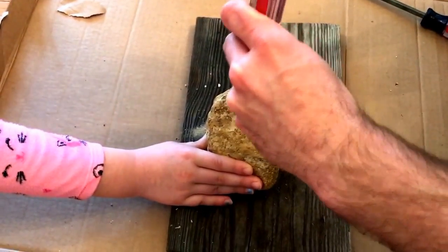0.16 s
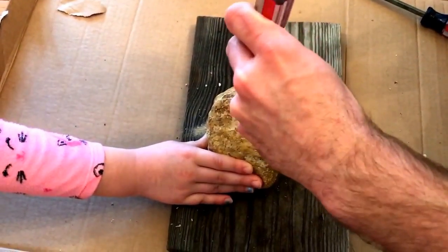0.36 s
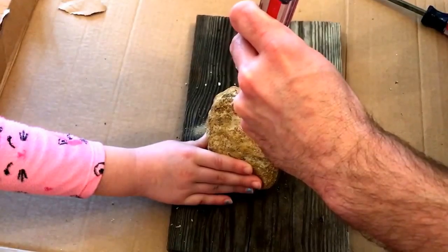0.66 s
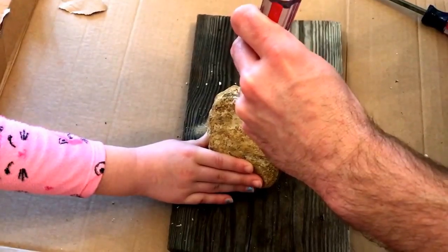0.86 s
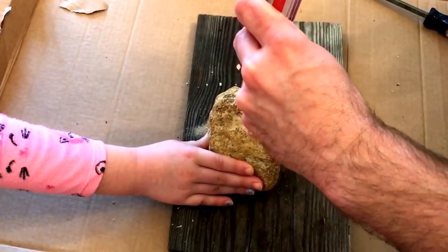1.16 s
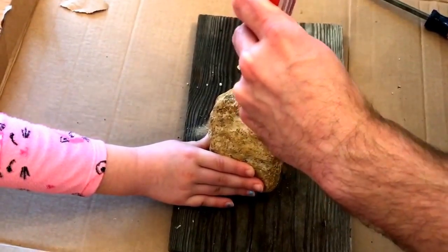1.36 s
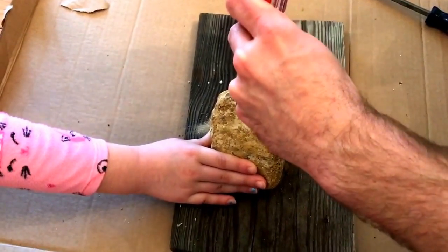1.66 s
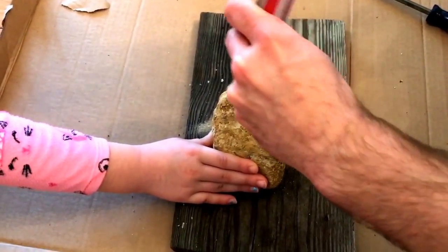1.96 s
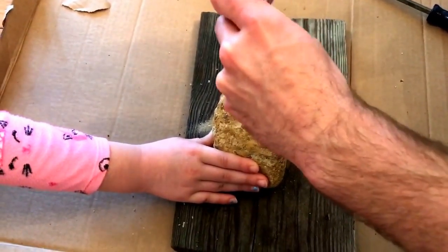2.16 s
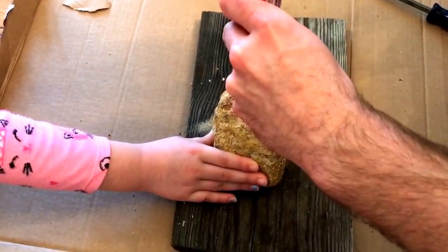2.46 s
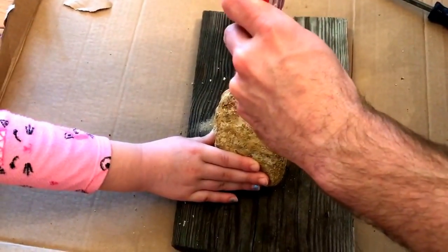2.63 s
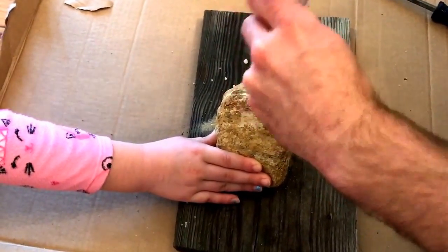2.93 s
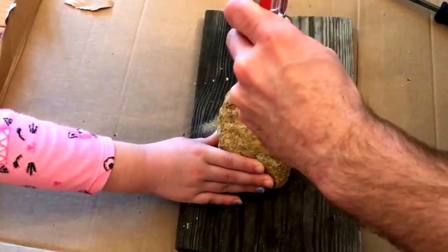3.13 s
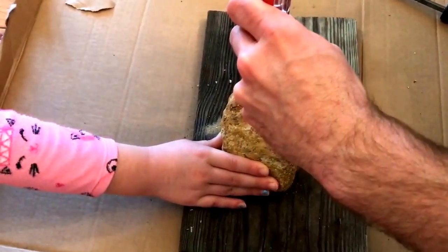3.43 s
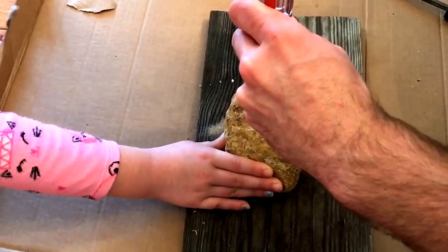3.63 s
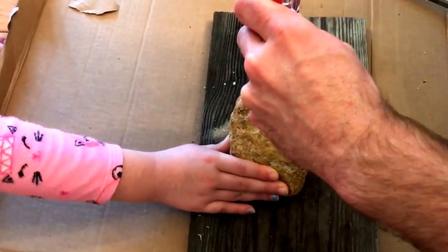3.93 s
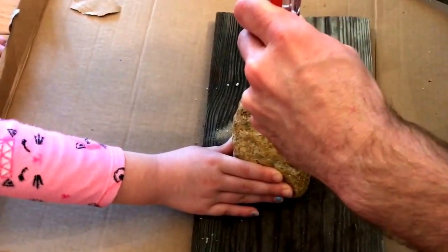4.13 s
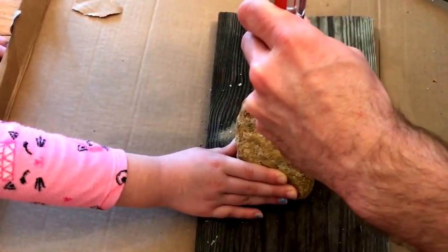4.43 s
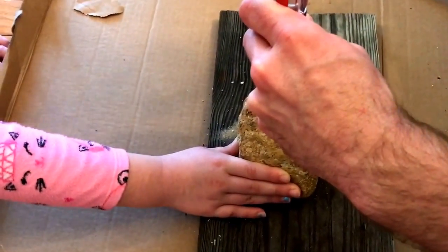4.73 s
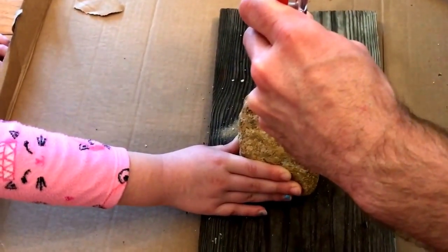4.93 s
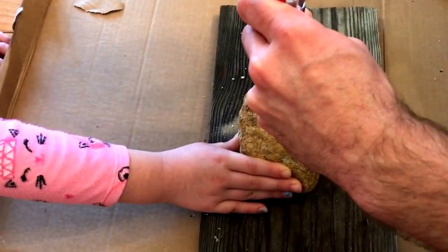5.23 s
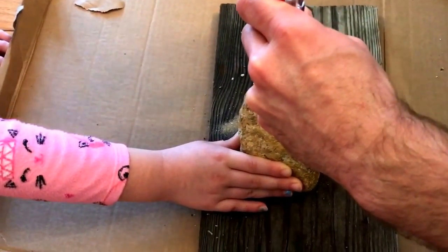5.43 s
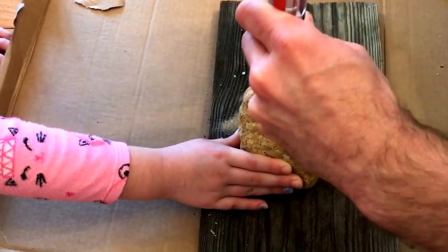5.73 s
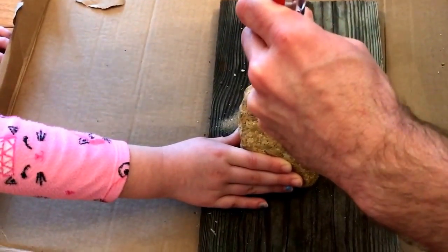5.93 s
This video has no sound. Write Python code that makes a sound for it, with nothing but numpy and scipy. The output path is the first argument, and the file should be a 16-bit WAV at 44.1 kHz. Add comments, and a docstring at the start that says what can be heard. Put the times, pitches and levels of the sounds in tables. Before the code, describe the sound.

The echo of an earlier hammer blow dies away with tiny clicks of a steel tip slipping on stone. Two hard blows strike the screwdriver used as a chisel, then two slips and a very short scrape. A lighter tap begins a regular run of blows, each a dry stony crack with a low plank thump, faint high ring and gritty chips. Close microphone in a small, lively room with a quiet low rumble.

```python
"""The tail of an earlier hammer blow, then small slips of a screwdriver tip on a lump of stone, over a quiet rumble.
Two blows follow on the screwdriver, held like a chisel, then two slips; the tip is dragged to a new place.
A run of blows ends the scene: each clicks, knocks the stone, thumps and rocks the plank under it in its
cardboard tray, rings the steel shaft, crushes grit and sends off chips. Parts are dying modes and noise bursts.
A small room answers; the gain control of the close microphone ducks the peaks over its limit."""
import sys
import numpy as np
from scipy import signal
from scipy.fft import rfft, irfft
from scipy.io import wavfile
from scipy.ndimage import uniform_filter1d, minimum_filter1d

SR = 44100
rng = np.random.default_rng(int(sys.argv[2]) if len(sys.argv) > 2 else 0)


def wav_out(sig):
    """Save sig, one row per channel (or a flat mono array), as 16-bit PCM at SR to the path in sys.argv[1]."""
    wavfile.write(sys.argv[1], SR, np.round(np.clip(np.atleast_2d(sig).T, -1, 1) * 32767).astype(np.int16))


N = 268569
LEAD_S = 1  # run-in, so that the earlier blow still echoes at the start


def amp(db):
    """Amplitude factor of a level in dB."""
    return 10 ** (np.asarray(db) / 20)


def read(points, hz):
    """Interpolates a (pitch_hz, value) table over log frequency."""
    pitch_hz, value = np.transpose(points)
    return np.interp(np.log(hz + 1), np.log(pitch_hz), value)


def add(mix, start_s, sound):
    """Mixes a sound in at start_s; what falls outside is dropped."""
    start = int(round(start_s * SR))
    sound = sound[max(-start, 0):]
    part = mix[max(start, 0):][:len(sound)]
    part += sound[:len(part)]


def noise(spectrum, size):
    """Coloured noise of rms 1."""
    gain = amp(read(spectrum, np.fft.rfftfreq(size, 1 / SR)))
    x = irfft(rfft(rng.standard_normal(size)) * gain, size)
    return x / x.std()


def burst(spectrum, decay_s):
    """One second holding a sharp puff of noise with exponential decay."""
    return noise(spectrum, SR) * np.exp(-np.arange(SR) / SR / decay_s)


def ring(modes, detune=0, step_gain=1):
    """One second of dying modes; a shifted grip detunes them, a negative step_gain opposes neighbours."""
    t = np.arange(SR) / SR
    pitch = 1 + detune * rng.standard_normal()
    out = np.zeros(SR)
    for k, (pitch_hz, level_db, t60_s) in enumerate(modes):
        envelope = amp(level_db - 60 * t / t60_s)
        out += step_gain ** k * envelope * np.sin(2 * np.pi * pitch_hz * pitch * t)
    return out


def snap(spectrum, lag_s):
    """Contact click spread by bending waves: treble arrives first, 1 kHz about lag_s later."""
    hz = np.fft.rfftfreq(SR, 1 / SR)
    phase = 4 * np.pi * lag_s * np.sqrt(1000 * hz)  # delay goes as 1 / sqrt(hz)
    return irfft(amp(read(spectrum, hz)) * np.exp(-1j * phase), SR) * np.linspace(1, 0, SR)


# background spectrum: pitch_hz, level_db
RUMBLE = [(20, -2.5), (60, 5), (125, -5), (200, -12), (500, -18.5), (1400, -20), (2500, -25.5),
          (6000, -28.5), (15000, -33.5)]


def rumble():
    """Steady, quiet background as coloured noise."""
    return amp(-63.5) * noise(RUMBLE, N)


def tail(colour, t60, onset_s):
    """Dense random reflections, each band dying at its own speed."""
    taps = rng.choice([-1., 1.], SR) * (rng.random(SR) < .2)
    hz, t, z = signal.stft(taps / taps.std(), SR, nperseg=256)
    rate = np.log(1000) / read(t60, hz)[:, None]
    level = amp(read(colour, hz))[:, None] * np.sqrt(2 * rate / SR)  # root: equal energy at any t60
    z = z * level * np.exp(-rate * t)
    fade_in = 1 - np.exp(-(np.arange(SR) / SR / onset_s) ** 2)
    return signal.istft(z, SR, nperseg=256)[1][:SR] * fade_in


# reflection spectra, near walls and long tail: pitch_hz, level_db
NEAR_COLOUR = [(50, -28), (140, -15), (220, -18), (300, -2.5), (600, -1.5), (1500, -7.5), (2500, -9),
               (4000, -9.5), (8000, -11.5), (15000, -42)]
LATE_COLOUR = [(50, -35), (140, -28.5), (280, -4), (700, -13), (1500, -10.5), (2500, -17.5), (4000, -17),
               (8000, -22), (15000, -15)]
# decay of each: pitch_hz, t60_s
NEAR_T60 = [(100, 0.74), (1000, 0.27), (3500, 0.28), (8000, 0.25), (15000, 0.24)]
LATE_T60 = [(100, 0.88), (1000, 1), (3500, 0.93), (8000, 0.73), (15000, 0.39)]


def room():
    """Direct sound, quick answer of near walls and a longer tail that builds more slowly."""
    response = tail(NEAR_COLOUR, NEAR_T60, onset_s=0.0031) + tail(LATE_COLOUR, LATE_T60, onset_s=0.042)
    response[0] += 1
    return response


# spectrum of a catch of the tip: pitch_hz, level_db
SCRAPE = [(200, -36), (700, -6), (1050, 12.5), (1700, -1), (2500, -26), (7000, -12), (16000, -27)]
DRAG_START_S, DRAG_END_S, CATCHES_PER_S = 2.68, 2.785, 57
DRAG_END_DB, DRAG_RISE_DB = -53, 0.5  # nearly even level through the drag


def scrape(jitter_s=0.0035):
    """The dragged tip sticks and slips over the stone: a noise burst per catch."""
    out = np.zeros(N)
    length_s = DRAG_END_S - DRAG_START_S
    count = max(round(length_s * CATCHES_PER_S), 1) + 1
    for way in np.linspace(0, 1, count):
        start_s = DRAG_START_S + way * length_s + jitter_s * rng.standard_normal()
        level_db = DRAG_END_DB - DRAG_RISE_DB * (1 - way)
        add(out, start_s, amp(level_db) * burst(SCRAPE, decay_s=0.0038))
    return out


# plank modes: pitch_hz, level_db, t60_s
PLANK = [(62.3, -20, 0.51), (117.4, -21, 0.33), (166.9, -3, .11), (222.4, -4.5, 0.07), (245, -15.5, 0.28),
         (326.7, -16.5, 0.094)]
ROCK_START_S, ROCK_GAP_S, ROCK_GAP_GROWTH = 0.004686, .0133, 1.06
ROCK_PUSH, ROCK_PUSH_KEPT = 0.6, 0.73


def plank(count=5):
    """The plank gives, then rocks on the cardboard ever more slowly and weakly; each push rings its modes."""
    out = np.zeros(SR)
    modes = ring(PLANK)
    start_s = ROCK_START_S
    for k in range(count):
        add(out, start_s, -ROCK_PUSH * ROCK_PUSH_KEPT ** k * modes)
        start_s += ROCK_GAP_S * ROCK_GAP_GROWTH ** k
    return out


# spectrum of the slip click: pitch_hz, level_db
CRUMB = [(100, -14.5), (500, 15.5), (1600, 2), (2800, -2), (4500, 2.5), (8000, 2), (11000, -9), (16000, -5)]
SETTLE_S, SETTLE_DB = .018, -12.5  # delay and level change per settling step


def slip(thump, click_db, plank_db, count=3):
    """The tip slips with a click that nudges the plank, then settles in weaker steps."""
    out = np.zeros(SR)
    for k in range(count):
        step = amp(click_db) * burst(CRUMB, decay_s=0.0039) + amp(plank_db) * thump
        add(out, k * SETTLE_S, amp(k * SETTLE_DB) * step)
    return out


# slips of the tip on the stone: start_s, click_db, plank_db
SLIPS = [(0.1679, -42, -78), (0.1914, -45.5, -70), (0.707, -49.5, -43), (2.0883, -35.5, -68),
         (2.3143, -38.5, -61)]


def add_slips(mix, thump):
    """Places each slip of the tip."""
    for start_s, click_db, plank_db in SLIPS:
        add(mix, start_s + LEAD_S, slip(thump, click_db, plank_db))


# chip spectrum: pitch_hz, level_db
CHIP = [(1500, -29.5), (4000, -1.5), (8000, -3), (10500, -4), (13500, 7), (16000, 2.5)]
CHIPS_DB_PER_GRIT_DB = 0.05  # more crushed stone, louder chips


def chips(grit_db, count=12, level_db=-47, spread_db=3.0, flight_s=0.064, scatter_s=0.26, fade_db_per_s=-22):
    """Chips fly off a blow and land as noise ticks, ever more rarely and softly."""
    out = np.zeros(SR)
    landings_s = flight_s + scatter_s * rng.exponential(1, count)
    for start_s, size in zip(landings_s, rng.standard_normal(count)):
        chip = noise(CHIP, size=256) * np.exp(-np.arange(256) / SR / 0.001)
        add(out, start_s, amp(level_db + spread_db * size + fade_db_per_s * start_s) * chip)
    return amp(CHIPS_DB_PER_GRIT_DB * grit_db) * out


# crushed stone spectrum: pitch_hz, level_db
GRIT = [(500, -11.5), (3000, 6.5), (6000, 6), (9000, 3.5), (10500, -2), (12500, -0.5), (16000, -11.5)]


def grit(grit_db):
    """The tip crushes stone: a sharp noise burst with a weaker, longer one."""
    crush = amp(-11.5) * burst(GRIT, decay_s=0.0012) + amp(-38.0) * burst(GRIT, decay_s=0.027)
    return amp(grit_db) * crush


# shaft ring and bending modes: pitch_hz, level_db, t60_s
SHAFT = [(7039, -29.5, 0.55), (7048, -45, 0.58)]
BENDING = [(5348, -29.5, 0.27), (5230, -48, 0.34), (6503, -43, 0.4)]
BENDING_DB, BENDING_DB_PER_HARDNESS, BENDING_OFF_CENTRE_DB = -4, .5, -7


def shaft(hardness_db, off_centre, shaft_db):
    """Long steel ring; a hard, square blow bends the shaft most."""
    bending_db = BENDING_DB + BENDING_DB_PER_HARDNESS * hardness_db + BENDING_OFF_CENTRE_DB * off_centre
    return amp(shaft_db) * ring(SHAFT) + amp(bending_db) * ring(BENDING)


# handle modes: pitch_hz, level_db, t60_s
HANDLE = [(3480, -11.5, 0.005), (4094, -14, 0.012), (2730, -23, 0.005)]


def handle(off_centre):
    """Short modes of the handle, clacked by an off-centre blow."""
    return off_centre * amp(7.5) * ring(HANDLE, detune=0.041, step_gain=-1.2)


# short steel modes: pitch_hz, level_db, t60_s
STEEL = [(7230, 4, 0.00082), (8300, 2, 0.0059), (9300, -12, 0.012)]
STEEL_DB, STEEL_OFF_CENTRE_DB = -1, -17.5


def steel(off_centre):
    """Brief zing of the steel, spared by an off-centre blow."""
    return amp(STEEL_DB + STEEL_OFF_CENTRE_DB * off_centre) * ring(STEEL, detune=0.0097, step_gain=-0.69)


# stone modes: pitch_hz, level_db, t60_s
STONE = [(659, -1.5, 0.0063), (761, -16.5, 0.0057), (1114, 2, 0.012), (1377, -15, 0.025),
         (2055, -10.5, 0.025)]
# contact click spectrum: pitch_hz, level_db
CRACK = [(100, -9.5), (400, 26), (550, 30), (1000, 27), (1600, 30.5), (2100, 16.5), (2600, 22), (4000, 14),
         (5500, 10.5), (9200, 16.5), (10500, -13), (16000, -19.5)]
# tilt by a short, hard contact: pitch_hz, level_db_per_hardness_db
HARD_TILT = [(400, -1.17), (1100, 0.5), (1900, 1.45), (3000, 1), (6000, 2), (9500, 0.7)]


def stone(hardness_db):
    """Knock of the stone's modes plus the contact click; a harder contact lifts the treble over the bass."""
    def tilt_db(hz):
        return hardness_db * read(HARD_TILT, hz)

    modes = [(hz, level_db + tilt_db(hz), t60_s) for hz, level_db, t60_s in STONE]
    click = [(hz, level_db + tilt_db(hz)) for hz, level_db in CRACK]
    return ring(modes, detune=0.036, step_gain=-0.98) + snap(click, lag_s=0.0012083)


THUMP_DB, THUMP_DB_PER_HARDNESS = 1.5, -0.1  # a soft, long contact pushes the plank more


def blow(thump, force_db, hardness_db, off_centre, grit_db, shaft_db):
    """Hammer, tool, stone and plank sound together; force scales the plank, stone and short steel."""
    push = amp(THUMP_DB + THUMP_DB_PER_HARDNESS * hardness_db) * thump
    struck = amp(force_db) * (push + stone(hardness_db) + steel(off_centre))
    tool = handle(off_centre) + shaft(hardness_db, off_centre, shaft_db)
    return struck + tool + grit(grit_db) + chips(grit_db)


# hammer blows: start_s, force_db, hardness_db, off_centre (0-1), grit_db, shaft_db
BLOWS = [(-.39, 5.5, -0.5, 0, 13, -12), (1.3575, 2, -5.5, 0, 10.5, 5.5), (1.7731, 1, -1, .25, 6.5, -6.5),
         (2.8788, -11.5, 8, 0.05, 3, -2.5), (3.3061, -2, -3, 0.99, -3, -6), (3.6328, 2, -1.5, 0.6, 7, -4),
         (3.985, 0, -1, 0.19, 2, -8.5), (4.3163, 0.5, -0.5, 0.06, 4, -6), (4.645, 0, 0, 0.3, -3, -16.5),
         (4.98, 0, 0, 0.48, 3, -14), (5.3263, -1, -3.5, 0, 11.5, -4), (5.6818, .5, 0, 0.53, 4.5, -19),
         (6.0681, 0, 1, 0.16, 9, -17)]


def add_blows(mix, thump):
    """Places each hammer blow."""
    for start_s, *settings in BLOWS:
        add(mix, start_s + LEAD_S, blow(thump, *settings))


def scene():
    """Blows, slips and a short scrape in the room, over its quiet rumble."""
    mix = np.zeros(N + LEAD_S * SR)
    thump = plank()
    add(mix, LEAD_S, scrape())
    add_slips(mix, thump)
    add_blows(mix, thump)
    in_room = signal.fftconvolve(mix, room())[LEAD_S * SR:][:N]
    return (in_room + rumble())[None]


def duck(x, limit_db, share, hold_s, recover_db_per_s, attack_s):
    """Cuts a share of the dB over the limit, holds the gain, then recovers at a steady rate."""
    over_db = np.clip(share, 0, 1) * np.maximum(20 * np.log10(abs(x) + 1e-9) - limit_db, 0)
    half = max(int(hold_s * SR / 2), 1)
    held_db = -minimum_filter1d(-over_db, 2 * half + 1, origin=half, mode="constant")
    fall_db = np.arange(N) * recover_db_per_s / SR
    cut_db = np.maximum.accumulate(held_db + fall_db) - fall_db
    size = max(int(attack_s * SR), 1)
    widened_db = -minimum_filter1d(-cut_db, size)
    return x * amp(-uniform_filter1d(widened_db, size))


def record(dry):
    """Bass roll-off, slow gain control, a fast peak limiter and the band limit."""
    x = signal.sosfilt(signal.butter(2, 48, "highpass", fs=SR, output="sos"), dry[0])
    x = duck(x, limit_db=-3.0, share=0.26, hold_s=0.22, recover_db_per_s=60, attack_s=0.003)
    x = duck(x, limit_db=-2.9, share=1, hold_s=.0003, recover_db_per_s=12000, attack_s=.0003)
    lowpass = signal.firwin(255, 16100, window=("kaiser", 9), fs=SR)
    return signal.oaconvolve(x, lowpass, "same")[None]


dry = scene()
out = record(dry)
wav_out(out)
```